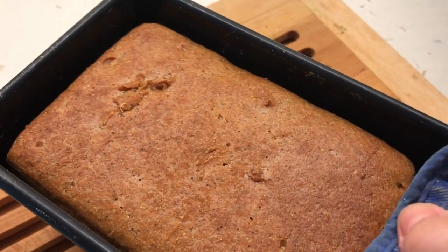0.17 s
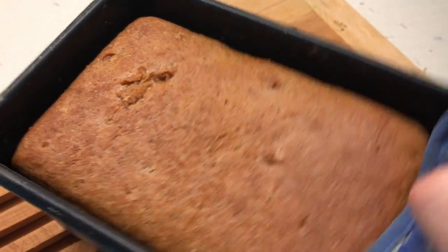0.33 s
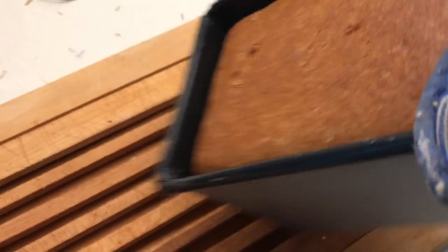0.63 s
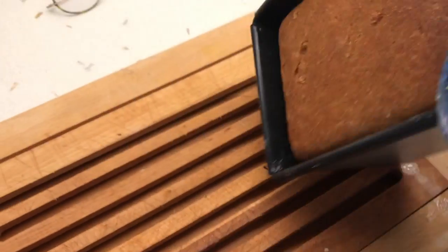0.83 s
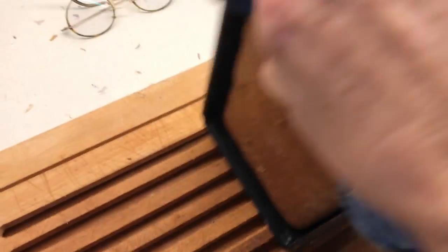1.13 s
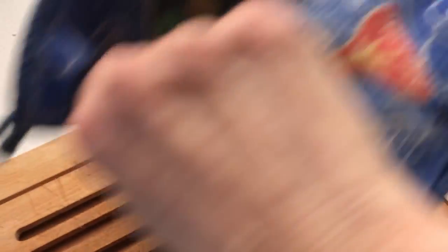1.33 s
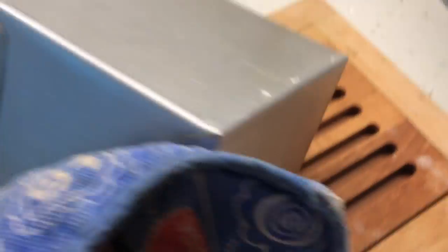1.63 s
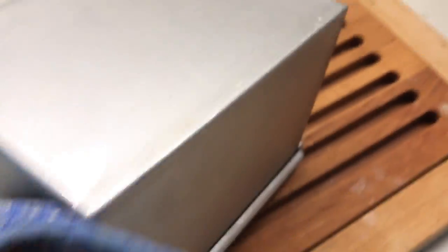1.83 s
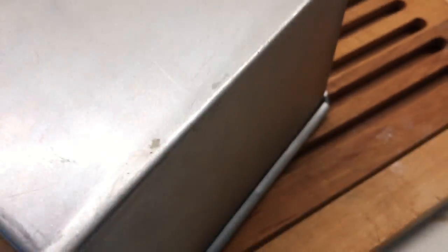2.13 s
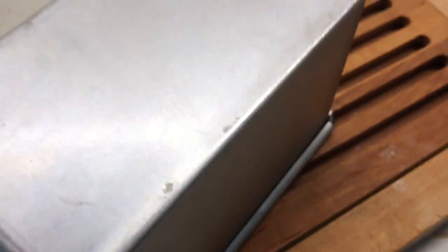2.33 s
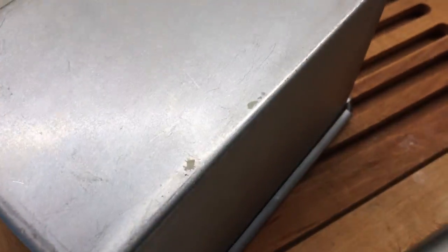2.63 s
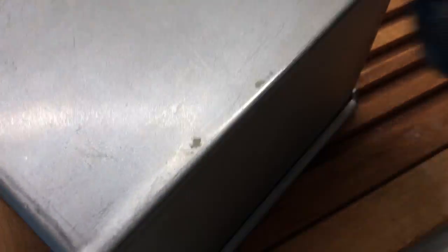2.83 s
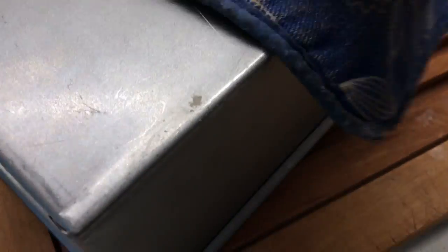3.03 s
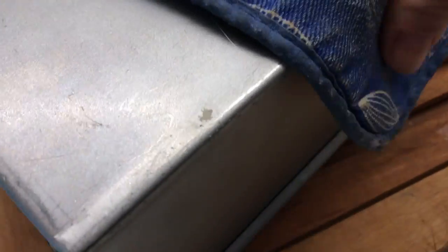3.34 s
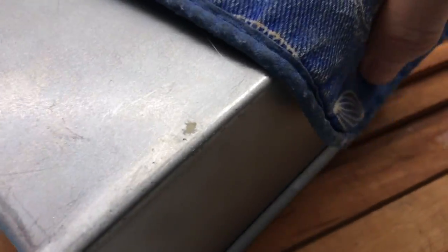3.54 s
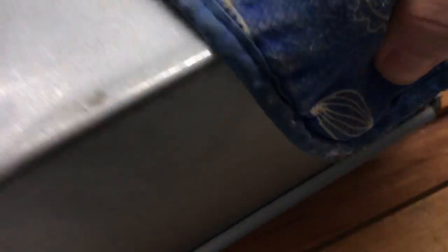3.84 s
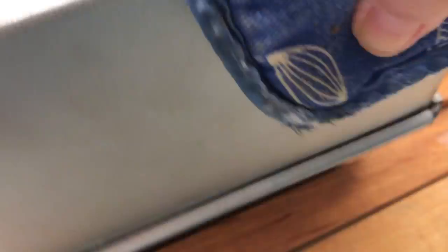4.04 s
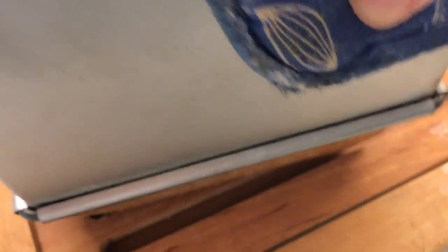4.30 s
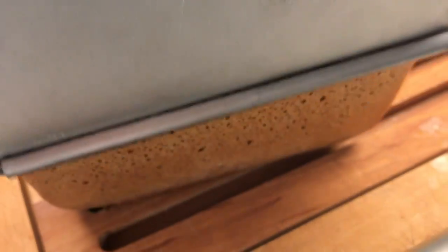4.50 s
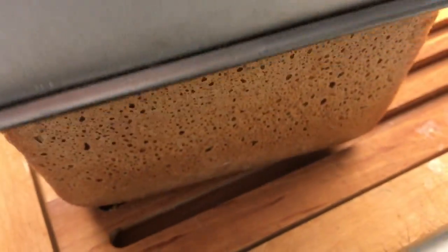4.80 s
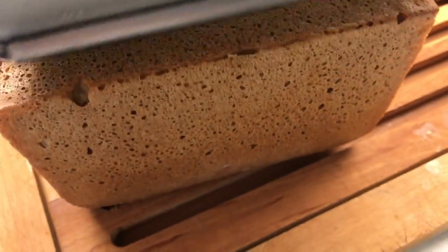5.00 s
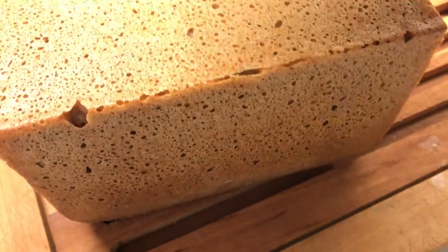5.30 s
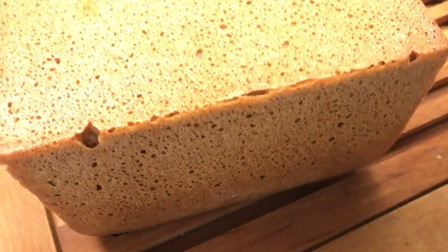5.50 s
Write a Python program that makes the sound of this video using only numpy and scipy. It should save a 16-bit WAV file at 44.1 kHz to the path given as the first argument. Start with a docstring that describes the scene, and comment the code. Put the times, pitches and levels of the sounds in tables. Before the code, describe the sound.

Short, damped metal clanks and woody thuds, recorded close with brief room reflections over low room noise and a faint hum. Rattling bumps come first, then a piercing hard knock just after one second and a heavy thump past two. Soft cloth rubbing follows, then a small metallic scrape and knocks as the tin is lifted, a murmuring slide, fine crackle, and the loaf's muffled landing.

```python
"""Loaf tin knocked over on a board

A metal loaf tin, held in a cloth mitt, is dragged, tipped and knocked over onto a wooden board in a small kitchen.
The loaf damps the tin's struck modes to short clanks and clunks; board and worktop modes thump under it.
The mitt's swishes and the rim's scrapes are crowds of small slips, shaped by movements that swell and die away.
At last the loaf murmurs out, starts to crackle, lands softly and hoots, over room noise and a hum."""
import sys
import numpy as np
from scipy import signal
from scipy.fft import rfft, irfft, next_fast_len
from scipy.io import wavfile

SR = 44100
rng = np.random.default_rng(int(sys.argv[2]) if len(sys.argv) > 2 else 0)


def inscribe(sig):
    """Save sig as 16-bit PCM at rate SR to the path in sys.argv[1].

    A 1-D sig is mono; a 2-D sig holds one channel per row.
    Samples are clipped to [-1, 1] before scaling.
    """
    pcm = np.round(np.clip(np.atleast_2d(sig).T, -1, 1) * 32767)
    wavfile.write(sys.argv[1], SR, pcm.astype(np.int16))


N = 249517  # samples in the scene

# steady room noise: pitch_hz, level_db
AIR_COLOUR = [(15, -44.5), (25, -2), (76, -10), (105, -4.5), (149, -9.5), (170, -20.5), (270, -13),
              (451, -21), (489, -21), (754, -24.5), (887, -24.5), (1940, -31.5), (2110, -34), (11900, -49),
              (16000, -44)]
# how long the room's reflections last: pitch_hz, t60_s
ROOM_T60 = [(60, 0.39), (130, 0.62), (300, 0.56), (1000, 0.63), (2800, 0.61), (6000, 0.398), (14000, 0.2)]
# how strong the room's reflections are: pitch_hz, level_db
ROOM_COLOUR = [(50, -3.5), (130, 12), (220, 1.5), (800, -3.5), (1300, 0.5), (1800, -1), (3000, -1.5),
               (7000, 5.5), (15000, 2)]
# high crackle near the end: pitch_hz, level_db
CRACKLE_COLOUR = [(1000, -22.5), (4000, -4), (8000, -1.5), (10500, -3.0), (13000, 2), (16000, -5.5)]
# small dry ticks; the highest are the microphone port ringing at the hardest blows: start_s, level_db, centre_hz
TICKS = [(1.146, -20.5, 12000), (2.283, -31.5, 11030), (3.047, -40.5, 3500), (4.089, -40.5, 3500),
         (4.182, -25.5, 1950), (4.226, -42, 1994), (4.875, -46, 3200), (4.969, -41, 2890)]

# Movements: full_speed_s, level_db, attack_s, hold_s, release_s. Colours: pitch_hz, level_db.
# swishes of the mitt over the metal, levels ahead of the mitt's own boost
MITT_STROKES = [(.46, -38.5, .13, 0.016, 0.078), (.948, -42, 0.0038, 0.0033, 0.1),
                (1.408, -45.5, 0.039, 0.0074, 0.049), (1.53, -43, 0.063, 0.025, 0.066),
                (1.662, -42, 0.0047, 0.041, 0.015), (1.84, -46, 0.3, 0.17, 0.049),
                (2.195, -45, 0.11, 0.041, 0.049)]
MITT_COLOUR = [(150, 3), (400, -3), (750, 3.5), (1200, -2), (2300, 1.5), (3600, -0.5), (6500, -6),
               (9000, -13), (12500, -14), (16000, -19.5)]
# light touches of the mitt on the upturned tin
GRIP_STROKES = [(2.97, -54.5, 0.046, 0.098, 0.093), (3.285, -53.5, 0.24, 0.046, 0.34),
                (4.52, -57.5, 0.11, 0.11, .08)]
GRIP_COLOUR = [(200, -20), (800, 9.5), (2000, 2.5), (4000, -0.5), (7000, -2), (10500, -4.5), (13000, 1),
               (16000, -2)]
# the rim sliding on wood
SCRAPE_STROKES = [(.526, -27, 0.009, 0.018, 0.019), (.587, -25.5, 0.0069, 0.021, 0.018),
                  (.689, -18, 0.0045, 0.0021, .02), (1.975, -44, .2, .03, 0.029),
                  (3.74, -41, 0.076, 0.22, 0.072), (3.79, -33.5, 0.015, 0.0089, 0.079),
                  (4.08, -39.5, 0.063, 0.14, 0.12), (4.26, -50.5, .06, .05, 0.022),
                  (4.48, -53.5, .25, 0.036, 0.24)]
SCRAPE_COLOUR = [(88, -35), (150, -3.5), (303, -4.5), (504, -10), (637, 2), (979, -3.5), (1120, -3.5),
                 (1500, -2.5), (1900, -3), (2920, -9.5), (3550, -11), (9260, -22.5), (16000, -29.5)]
# the board rumbling as weight shifts on it
RUMBLE_STROKES = [(1.16, -28, 0.025, 0.023, 0.12), (1.6, -38.5, .05, 0.099, .05),
                  (2.02, -32.5, .09, 0.018, 0.14), (3.04, -41, .1, 0.03, 0.14),
                  (3.72, -41.5, 0.095, .15, 0.58), (4.3, -50, 0.22, .015, 0.078)]
RUMBLE_COLOUR = [(25, -16.5), (45, 3.5), (120, -1.5), (180, -14.5), (400, -13), (2000, -74)]
# the loaf slipping down the hollow tin
SLIDE_STROKES = [(3.78, -46.5, .11, 0.26, 0.47), (4.5, -50.5, 0.29, 0.11, .16)]
SLIDE_COLOUR = [(120, -35), (280, 0), (440, 1.5), (640, -0.5), (850, -21), (1200, -8.5), (2500, -41.5)]

# close hollow modes of the hoot: pitch_hz, level_db, t60_s
HOOT_MODES = [(271, -16, 0.2), (385, -9, 0.36), (437, -6, 0.26), (460, 1.5, 0.027)]
# the loaf's soft landings as it drops free: start_s, peak_db, pitch_hz
LANDINGS = [(4.763, -32.5, 65), (4.793, -28, 60.3)]
# blows of the loaded tin's weight on the wood: start_s, level_db, brightness_hz, worktop_peak_db
THUDS = [(.603, -30.5, 352, -12.5), (.699, -21.5, 407, -28), (1.148, -21, 290, -9), (1.399, -29, 296, -34),
         (1.565, -30, 500, -23.5), (2.274, -2.5, 2420, -9.5), (2.324, -28.5, 713, -28.5),
         (3.03, -26, 454, -33), (3.709, -39, 379.5, -39.5), (4.008, -38, 400, -50)]
# modes of the board with the tin pressed on it: pitch_hz, level_db, t60_s
BOARD_MODES = [(175, -3, .05), (255, -3, .05), (304, 1, .06), (365, -5, .09), (452, 3, .07), (560, -7, .04),
               (700, -5, .05), (815, -3, .05), (944, -2, .08), (1257, -13, .05), (1386, -12, .06),
               (1485, -11, .05), (1757, -10, .05), (2005, -13, .04), (2333, -7, .035), (2600, -6, .03),
               (2920, -3, .035), (3300, -4, .025), (3754, 0, .015)]
# modes of the worktop under the board: pitch_hz, level_db, t60_s (before shortening)
WORKTOP_MODES = [(58, -8, 0.14), (100, 1, 0.04), (136, -4.5, 0.099)]
# round clunks of the tin shifting in the padded grip: start_s, level_db, pitch_hz
CLUNKS = [(.479, -19, 1000), (0.547, -19, 940), (.571, -17, 855), (.650, -15.5, 896), (.670, -21, 913),
          (.693, -11, 850), (.716, -11, 840), (.957, -17, 821), (1.118, -34.5, 920), (1.133, -16.5, 1020),
          (1.368, -26.5, 830), (1.3867, -17, 994), (1.635, -22.5, 837), (2.003, -24.5, 876),
          (2.0206, -24, 977), (2.041, -30.5, 886), (2.107, -31.5, 797), (2.261, -29.5, 833),
          (2.275, -11, 776), (2.325, -27, 793), (3.023, -36, 781), (3.276, -36, 909)]
# modes of a clunk: multiple of its pitch, level_db, t60_s
CLUNK_MODES = [(0.719, -4.5, .03), (0.999, 6.5, 0.031), (1.33, -4.5, 0.036), (1.75, -15.5, 0.023),
               (2.5, -15, 0.0207), (3.299, -20, 0.017)]
# dull rattle inside a clunk: pitch_hz, level_db
RATTLE_COLOUR = [(150, 0.5), (400, -9.5), (700, 5.0), (1300, -1.0), (1800, -10), (2500, -15.5), (5000, -42.0)]
# hard contacts of the tin: start_s, level_db, brightness_hz (high when hard), rebound_db (from one contact to the next)
KNOCKS = [(0.074, -39.5, 3370, -15), (.163, -44, 2650, -8), (.412, -34, 2480, -5), (.472, -25, 1817, -2.5),
          (.523, -24, 2097, -1), (.557, -25, 1297, -13.5), (.5685, -14.5, 1890, -12),
          (.584, -14, 3540, -3.5), (.603, -19.5, 3020, -3.5), (.6312, -19, 1690, -14),
          (.688, -16.5, 3370, -5), (.700, -9.5, 2310, -10), (.715, -17, 2326, -15),
          (.733, -15, 1653, -10.5), (.749, -22, 1500, -9.5), (0.9447, -23, 2240, -6.5),
          (1.1388, 0, 4000, -4), (1.169, -10.5, 2800, -4.5), (1.204, -16.5, 2390, -9),
          (1.561, -27.5, 1500, -7), (1.660, -25.5, 6210, -8.5), (2.2736, -12, 2370, -9),
          (3.7852, -32, 5000, -3), (4.07, -19.5, 5240, -32), (4.179, -27, 4150, -23)]
# modes of the loaded tin, before damping and random variation: pitch_hz, level_db, t60_s
TIN_MODES = [(567, -5, .14), (648, -4, .16), (818, 0, .14), (880, -4, .07), (985, -3, .08), (1160, -5, .08),
             (1249, 0, .12), (1340, -3, .12), (1380, -6, .12), (1470, -5, .10), (1560, -7, .09),
             (1677, -5, .11), (1850, -8, .09), (1980, -3, .09), (2085, 1, .11), (2212, -2, .11),
             (2300, -6, .09), (2420, -8, .09), (2649, 2, .10), (2780, 0, .10), (2960, -1, .09),
             (3040, -1, .09), (3190, -4, .09), (3297, -6, .09), (3590, -7, .09), (3741, -3, .09),
             (4050, -7, .08), (4740, -8, .08), (5350, -11, .08), (6730, -10, .08)]
# the tin's crowd of fast-dying modes: pitch_hz, level_db
CLANK_COLOUR = [(100, -6.5), (250, -2), (420, -9.5), (650, 4), (900, 2.5), (1600, -2), (2200, 0.5),
                (3100, -4), (4500, -8), (7000, -4), (10000, -9.5), (12000, 0.5), (16000, -13.5)]

AGE = np.arange(SR // 3) / SR  # seconds since a blow
FADE = np.log(1000)  # nepers in 60 dB


def amp(db):
    """Decibels to gain."""
    return 10 ** (np.asarray(db) / 20)


def unit(x):
    """Scales to rms 1."""
    return x / np.sqrt(np.mean(x ** 2) + 1e-20)


def unit_blow(x):
    """Scales a blow to the energy of 5 ms at rms 1."""
    return x / np.sqrt(np.sum(x ** 2) / (.005 * SR))


def die_away(t60):
    """The envelope of a blow that loses 60 dB in t60 seconds."""
    return np.exp(-FADE * AGE / t60)


def read(points, hz):
    """Reads a table on a log-frequency axis."""
    f, value = np.transpose(points)
    return np.interp(np.log(hz + 1), np.log(f + 1), value)


def colour(x, points):
    """Filters x by a spectral curve and scales it to rms 1."""
    size = next_fast_len(len(x))
    gain = amp(read(points, np.fft.rfftfreq(size, 1 / SR)))
    return unit(irfft(rfft(x, size) * gain, size)[:len(x)])


def noise(points, size):
    """Noise of rms 1 with the given spectrum."""
    return colour(rng.standard_normal(size), points)


def soften(x, hz, order=2):
    """Low-pass: a soft, long contact hardly excites what lies above hz."""
    return signal.sosfilt(signal.butter(order, min(hz, SR / 2 - 100), fs=SR, output="sos"), x)


def crack(low_hz, high_hz):
    """The sharp first push of a hard contact: a band-passed impulse."""
    band = signal.butter(2, [low_hz, min(high_hz, SR / 2 - 100)], "bandpass", fs=SR, output="sos")
    impulse = 1. * (AGE == 0)
    return unit_blow(signal.sosfilt(band, impulse))


def ring(modes, length=1):
    """Decaying sine modes, struck with alternating sign; length scales every decay time."""
    t = AGE.astype(np.float32)
    out = 0
    for k, (hz, db, t60) in enumerate(modes):
        decay = np.exp(t * float(-FADE / (t60 * length)))
        out = out + (-1) ** k * float(amp(db)) * decay * np.sin(t * float(2 * np.pi * hz))
    return out


def add(mix, s, sound):
    """Adds a sound at time s."""
    part = mix[round(s * SR):][:len(sound)]
    part += sound[:len(part)]


def stroke(t, s, db, attack, hold, release, span_db=21):
    """Gain of one movement: it swells until s, holds, and dies away; attack and release each span span_db."""
    away = np.maximum((s - t) / attack, 0) + np.maximum((t - s - hold) / release, 0)
    return amp(db - span_db * np.minimum(away, 10))


def strokes(rows):
    """The gain curve of a series of movements."""
    return sum(stroke(np.arange(N) / SR, *row) for row in rows)


def background(air_db=-47.5, hum_hz=104, hum_db=-51.5, waver=0.45):
    """Low room noise and an appliance's hum, its level wavering with slow noise."""
    drift = unit(soften(rng.standard_normal(N), 4))
    tone = np.sqrt(2) * np.sin(2 * np.pi * hum_hz * np.arange(N) / SR)
    hum = tone * (1 + waver * drift)
    return amp(air_db) * noise(AIR_COLOUR, N) + amp(hum_db) * hum


def kitchen(x, tail_gain=0.23658, build_s=0.0014):
    """Diffuse reflections build up quickly and die band by band."""
    hz, t, bands = signal.stft(rng.standard_normal(SR), SR, nperseg=512)
    decay = np.exp(-FADE * t / read(ROOM_T60, hz)[:, None])
    bands = bands * decay * amp(read(ROOM_COLOUR, hz))[:, None]
    build_up = 1 - np.exp(-(np.arange(SR) / SR / build_s) ** 2)
    tail = signal.istft(bands, SR, nperseg=512)[1][:SR] * build_up
    return x + tail_gain * signal.fftconvolve(x, tail / np.linalg.norm(tail))[:N]


def crackle(start_s=4.65, per_s=130, uneven_db=3.0, level_db=-66.5):
    """A very fine, high crackle, from just before the loaf drops: sparse random clicks of uneven size."""
    sizes = amp(uneven_db * np.minimum(rng.exponential(1, N), 3))
    clicks = sizes * (rng.random(N) < per_s / SR)
    return amp(level_db) * colour(clicks, CRACKLE_COLOUR) * (np.arange(N) / SR > start_s)


def ticks(t60=0.019, width=2.2):
    """Tiny dry snaps: short noise bursts, each in a broad band."""
    out = np.zeros(N)
    for s, db, hz in TICKS:
        band = signal.butter(1, [hz / width, min(hz * width, SR / 2 - 100)], "bandpass", fs=SR)
        snap = rng.standard_normal(len(AGE)) * die_away(t60)
        add(out, s, amp(db) * unit_blow(signal.lfilter(*band, snap)))
    return out


def friction(points, slips_per_s, uneven_db, smooth, body_t60=0.034, body_db=-5):
    """A crowd of small slips of uneven size over a smooth hiss, smeared by the sheet's dense modes."""
    sizes = amp(uneven_db * np.minimum(rng.exponential(1, N), 4)) * rng.choice([-1, 1], N)
    slips = unit(sizes * (rng.random(N) < slips_per_s / SR))
    rub = slips + smooth * rng.standard_normal(N)
    body = rng.standard_normal(len(AGE)) * die_away(body_t60)  # noise burst standing for the dense modes
    return colour(rub + amp(body_db) * unit(signal.oaconvolve(rub, body)[:N]), points)


def rubbing(mitt_db=3.5, metal_db=-25.5):
    """Cloth swishes on the tin; the rim grates, rings it faintly and the board rumbles."""
    mitt = friction(MITT_COLOUR, slips_per_s=3100, uneven_db=0.5, smooth=0.89) * strokes(MITT_STROKES)
    grip = friction(GRIP_COLOUR, slips_per_s=3600, uneven_db=4.0, smooth=0.84) * strokes(GRIP_STROKES)
    grit = friction(SCRAPE_COLOUR, slips_per_s=1300, uneven_db=4.0, smooth=0.51)
    metal = unit(signal.oaconvolve(grit, ring(TIN_MODES, 0.88))[:N])
    scrape = (grit + amp(metal_db) * metal) * strokes(SCRAPE_STROKES)
    rumble = noise(RUMBLE_COLOUR, N) * strokes(RUMBLE_STROKES)
    return amp(mitt_db) * mitt + grip + scrape + rumble


def loaf(hoot_s=4.867, hoot_db=-27.5, rise_s=.002):
    """The loaf slides out with a hollow murmur; just after it lands, close hollow modes beat in a short hoot."""
    out = noise(SLIDE_COLOUR, N) * strokes(SLIDE_STROKES)
    hoot = ring(HOOT_MODES) * (1 - np.exp(-AGE / rise_s))
    add(out, hoot_s, amp(hoot_db) * unit_blow(hoot))
    return out


def thumps(rise_s=.0013, landing_t60=0.066, length=0.93):
    """The worktop bounces slowly under every thud, just after every clunk, and when the loaf lands."""
    # a clunk's bounce: delay, peak after a 0 dB clunk, dB of bounce per dB of clunk
    lag_s, bounce_db, slope = .011, -9, 0.63
    pushes = [(s, peak_db, WORKTOP_MODES) for s, _, _, peak_db in THUDS]
    pushes += [(s + lag_s, bounce_db + slope * db, WORKTOP_MODES) for s, db, _ in CLUNKS]
    pushes += [(s, peak_db, [(hz, 0, landing_t60)]) for s, peak_db, hz in LANDINGS]
    out = np.zeros(N)
    for s, peak_db, modes in pushes:
        bounce = ring(modes, length) * (1 - np.exp(-AGE / rise_s))
        add(out, s, amp(peak_db) * bounce / abs(bounce).max())
    return out


def board(grain_db=-1.5, grain_t60=0.056, grain_hz=2500, crack_db=-5.0):
    """The wood answers the tin's weight with a hollow thud of modes, dull grain noise and a crack."""
    out = np.zeros(N)
    for s, db, bright_hz, _ in THUDS:
        grain = soften(rng.standard_normal(len(AGE)), grain_hz) * die_away(grain_t60)
        thud = unit_blow(ring(BOARD_MODES)) + amp(grain_db) * unit_blow(grain)
        thud = thud + amp(crack_db) * crack(low_hz=1500, high_hz=3793)
        add(out, s, amp(db) * unit_blow(soften(thud, bright_hz, order=3)))
    return out


def clunks(rattle_db=-2.0, rattle_t60=.035, rise_s=.0024):
    """A cushioned push swells the wall's lowest modes with a dull rattle; the grip damps them at once."""
    swell = 1 - np.exp(-(AGE / rise_s) ** 2)
    out = np.zeros(N)
    for s, db, hz in CLUNKS:
        modes = ring([(hz * multiple, mode_db, t60) for multiple, mode_db, t60 in CLUNK_MODES])
        rattle = noise(RATTLE_COLOUR, len(AGE)) * die_away(rattle_t60)
        clunk = unit_blow(modes * swell) + amp(rattle_db) * unit_blow(rattle * swell)
        add(out, s, amp(db) * unit_blow(clunk))
    return out


def contacts(count=3, gap_s=.0073, gap_ratio=.85, dulling=0.71):
    """A struck rim chatters: each knock and its rebounds, ever sooner, weaker and duller."""
    for s, db, bright_hz, rebound_db in KNOCKS:
        for k in range(count):
            yield s, db + k * rebound_db, bright_hz * dulling ** k
            s += gap_s * gap_ratio ** k


def tin(vary_db=6.5, detune=.005, clank_db=2.5, clank_t60=.045, crack_db=-10.0):
    """Each contact cracks and rings the tin's modes over a dense short clank."""
    out = np.zeros(N)
    for s, db, bright_hz in contacts():
        # a harder blow presses the tin against the wood and shortens its ring: 0.5 of full length at 0 dB
        length = 0.5 * np.exp(-0.018 * db)
        # each contact's modes are varied slightly at random in pitch and strength
        variation = rng.standard_normal((len(TIN_MODES), 2))
        varied = [(hz * (1 + detune * u), mode_db + vary_db * v, t60)
                  for (hz, mode_db, t60), (u, v) in zip(TIN_MODES, variation)]
        modes = ring(varied, length * 0.75)  # the grip shortens the modes further
        modes = modes * (1 - np.exp(-AGE / .001))  # bending waves take a moment to fill the sheet
        clank = noise(CLANK_COLOUR, len(AGE)) * die_away(clank_t60 * length)
        blow = unit_blow(modes) + amp(clank_db) * unit_blow(clank)
        blow = blow + amp(crack_db) * crack(low_hz=1890, high_hz=3500)
        add(out, s, amp(db) * unit_blow(soften(blow, bright_hz)))
    return out


def scene():
    """Tin, loaf and wood ring in the room; crackle and background stay outside its reflections."""
    handling = ticks() + rubbing() + loaf()
    blows = thumps() + board() + clunks() + tin()
    return (background() + crackle() + kitchen(handling + blows))[None]


def record(dry, bass_cut_hz=38, edge_hz=15750):
    """The microphone drops the deepest bass and overloads above full scale; then the band limit."""
    thinned = signal.sosfilt(signal.butter(5, bass_cut_hz, "highpass", fs=SR, output="sos"), dry)
    clipped = np.clip(thinned, -1, 1)
    band_limit = signal.firwin(511, edge_hz, window=("kaiser", 9), fs=SR)
    return signal.oaconvolve(clipped, band_limit[None], "same")


dry = scene()
out = record(dry)
inscribe(out)
```